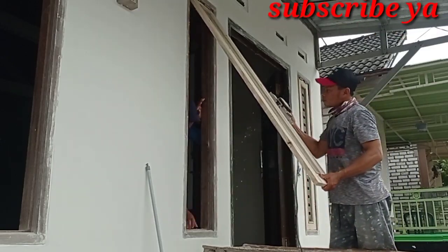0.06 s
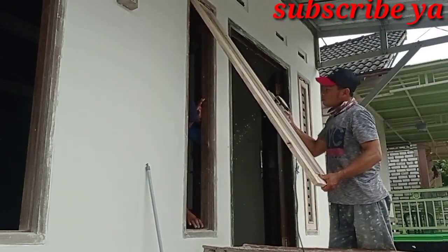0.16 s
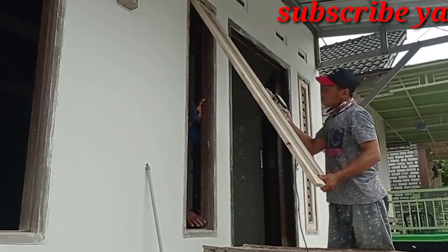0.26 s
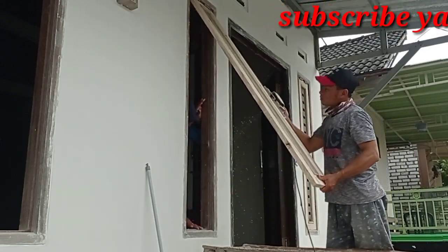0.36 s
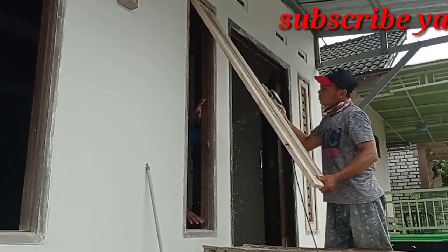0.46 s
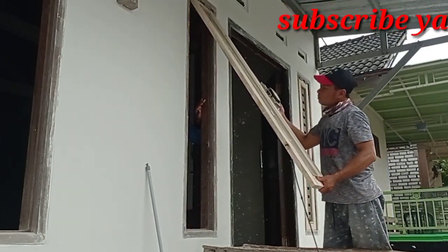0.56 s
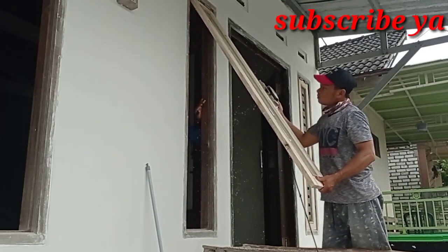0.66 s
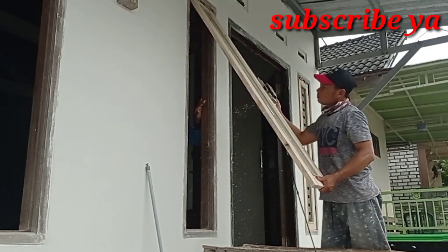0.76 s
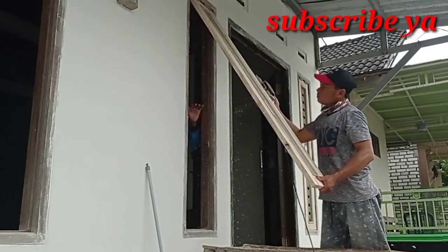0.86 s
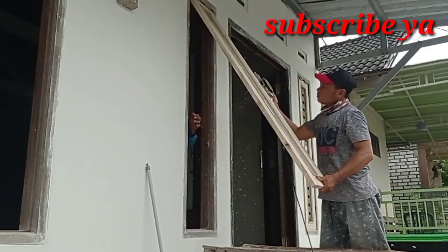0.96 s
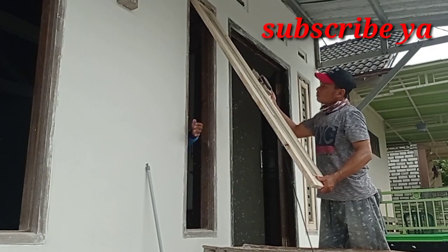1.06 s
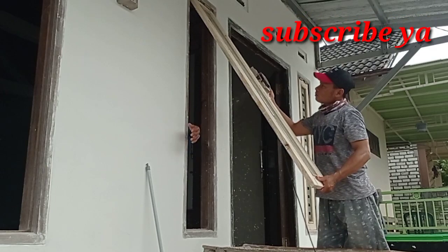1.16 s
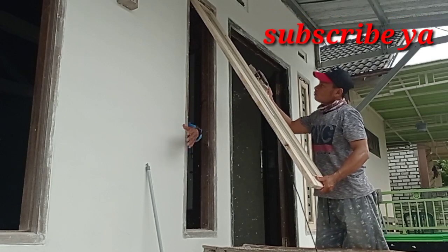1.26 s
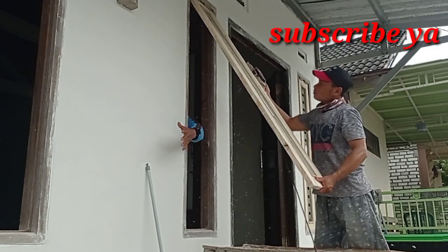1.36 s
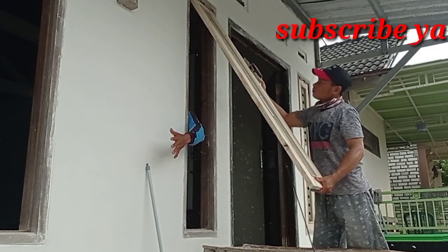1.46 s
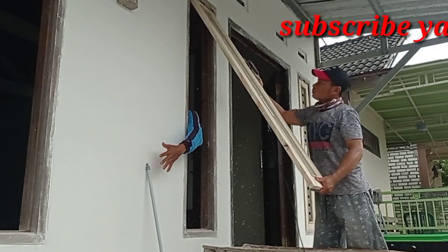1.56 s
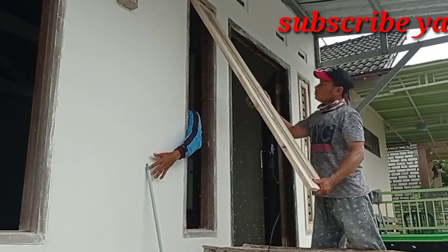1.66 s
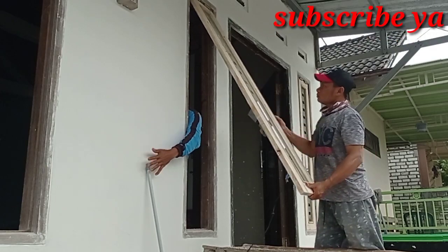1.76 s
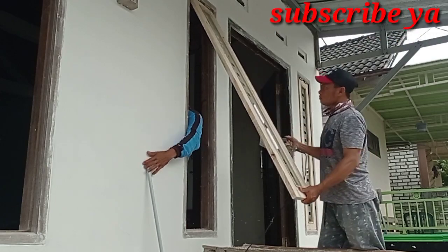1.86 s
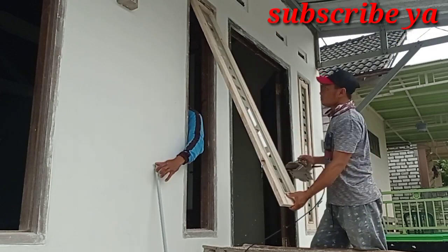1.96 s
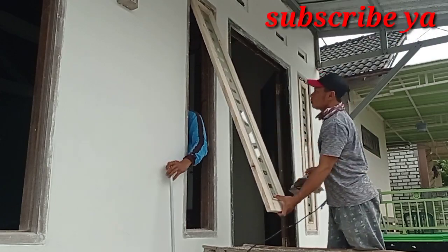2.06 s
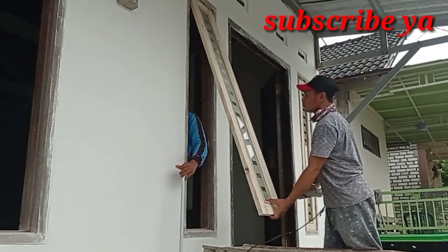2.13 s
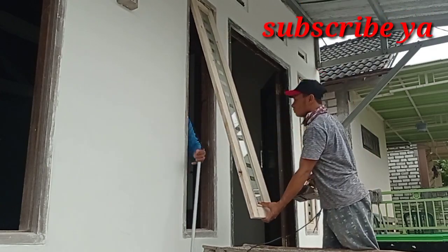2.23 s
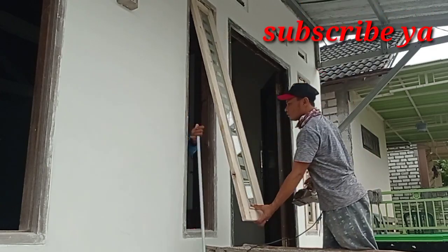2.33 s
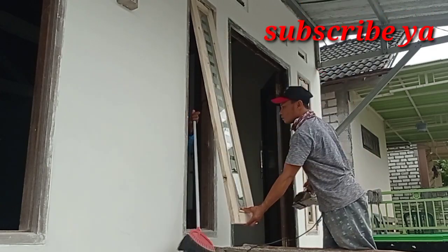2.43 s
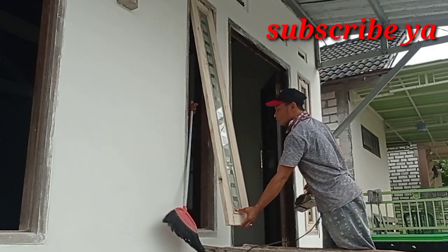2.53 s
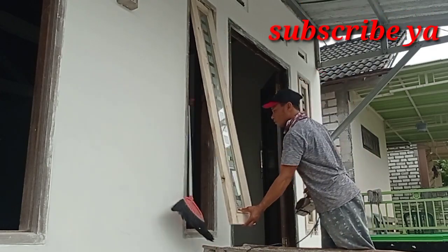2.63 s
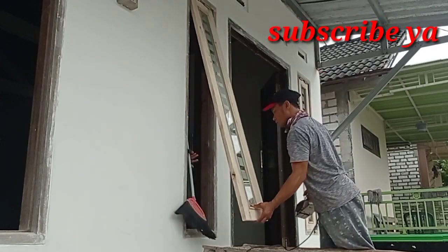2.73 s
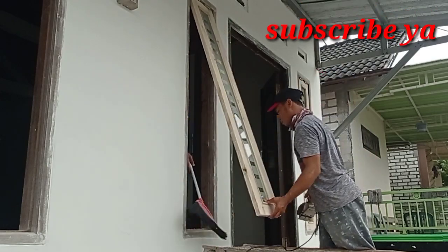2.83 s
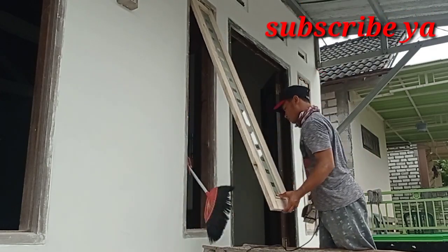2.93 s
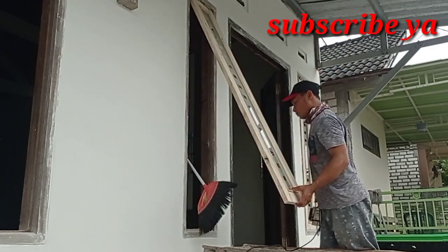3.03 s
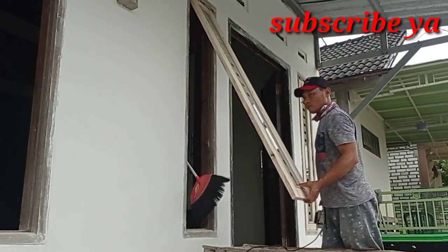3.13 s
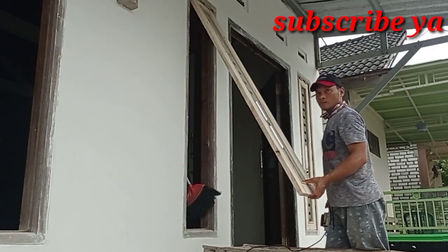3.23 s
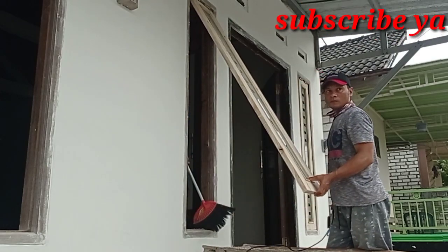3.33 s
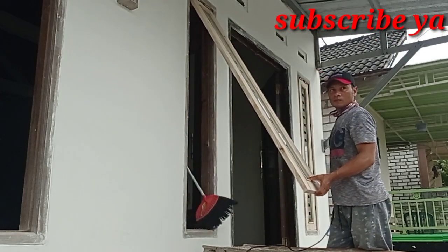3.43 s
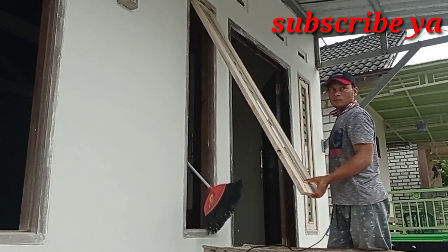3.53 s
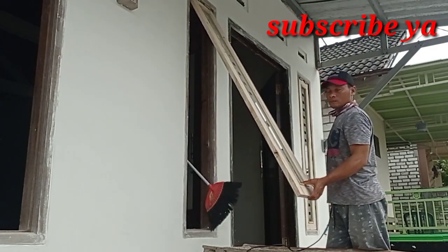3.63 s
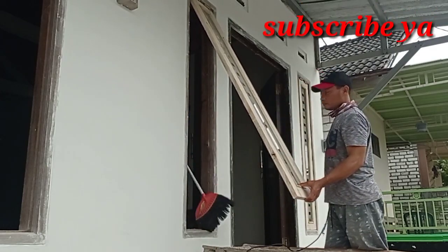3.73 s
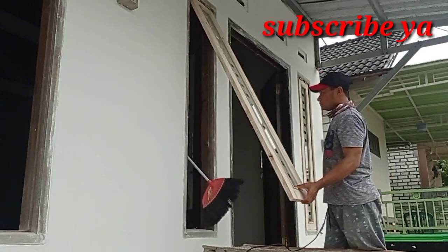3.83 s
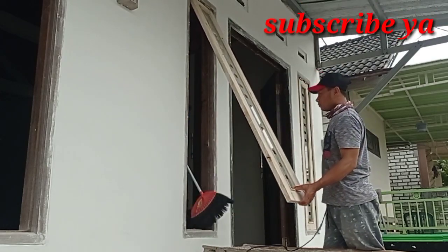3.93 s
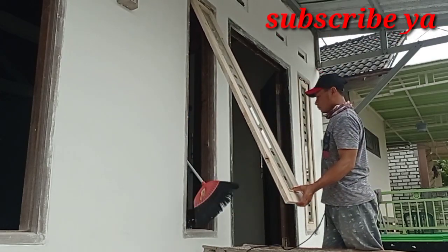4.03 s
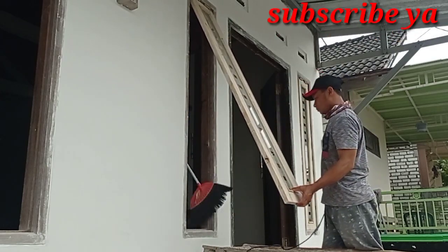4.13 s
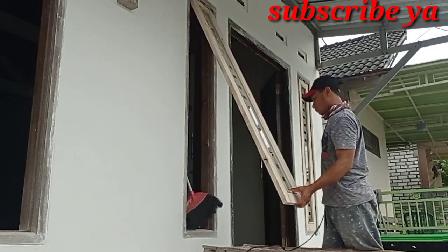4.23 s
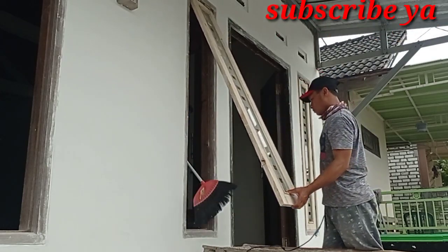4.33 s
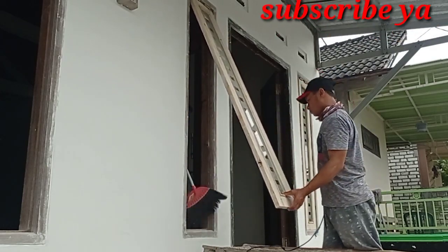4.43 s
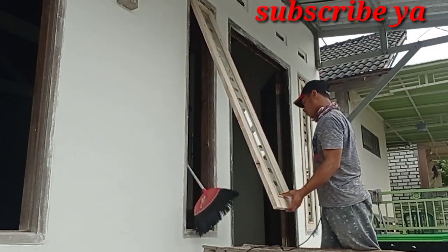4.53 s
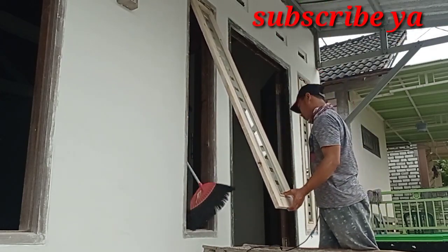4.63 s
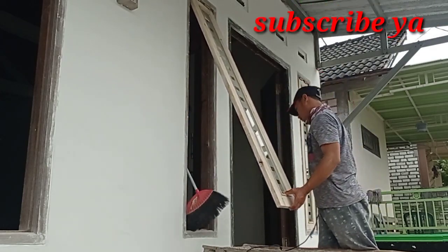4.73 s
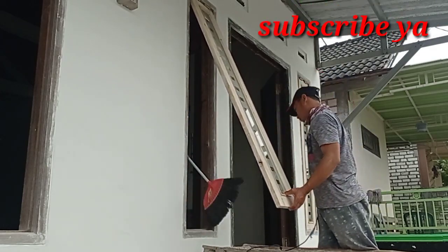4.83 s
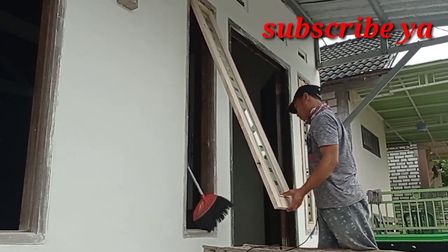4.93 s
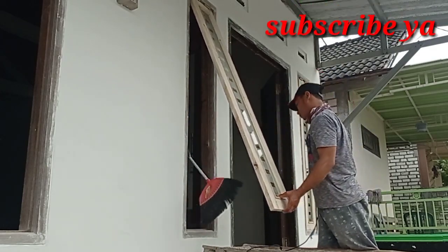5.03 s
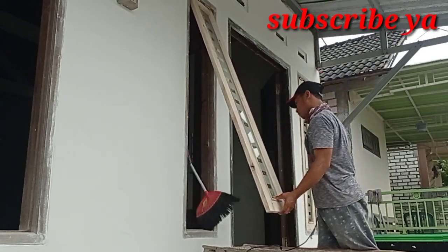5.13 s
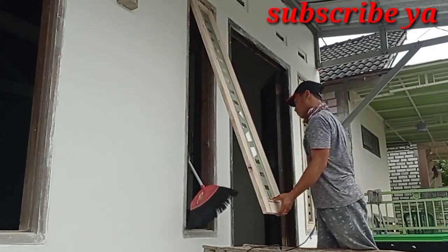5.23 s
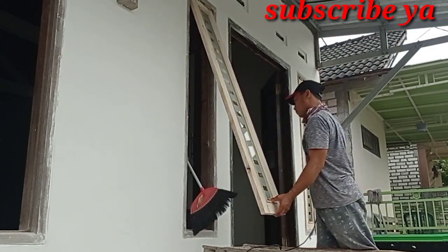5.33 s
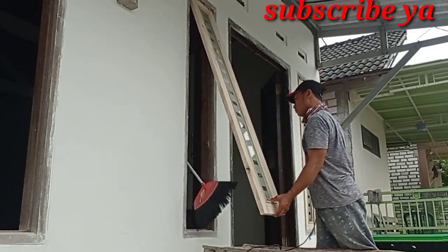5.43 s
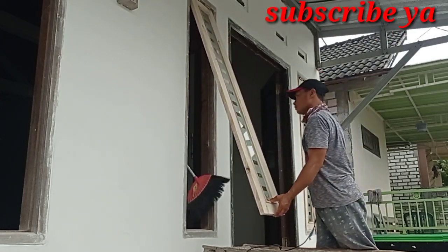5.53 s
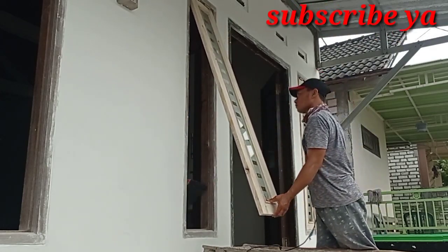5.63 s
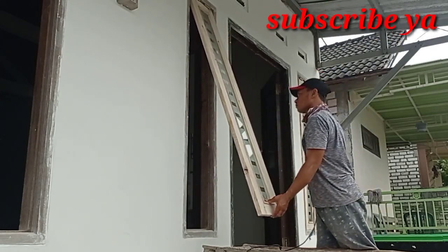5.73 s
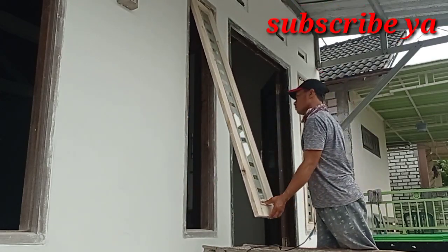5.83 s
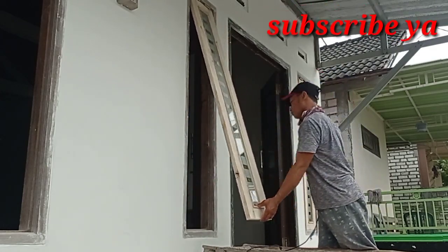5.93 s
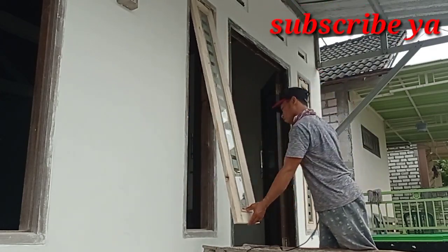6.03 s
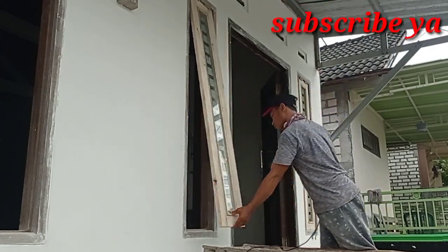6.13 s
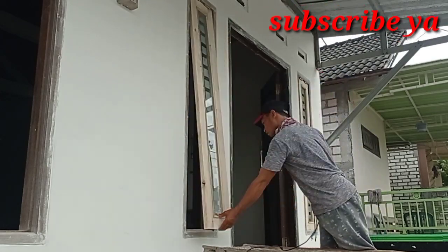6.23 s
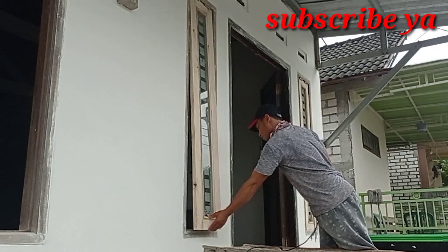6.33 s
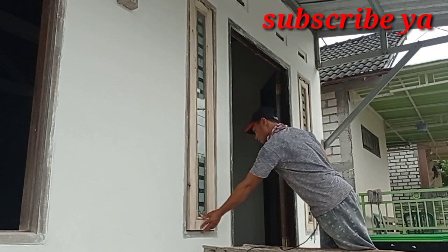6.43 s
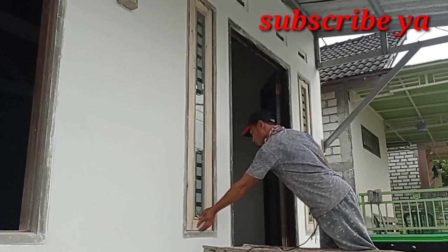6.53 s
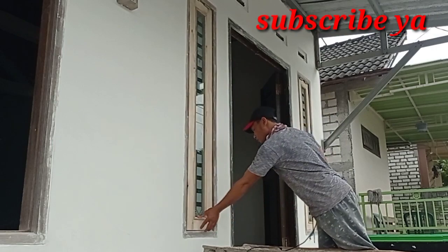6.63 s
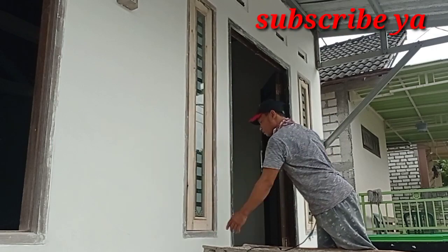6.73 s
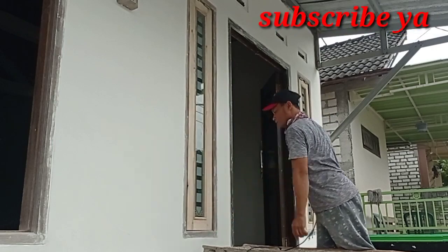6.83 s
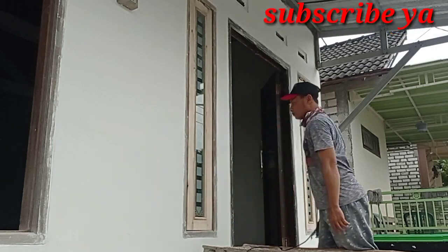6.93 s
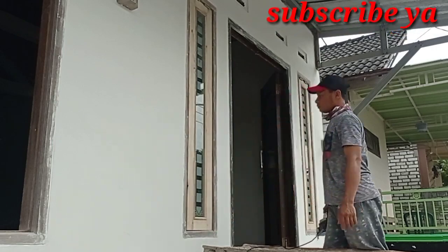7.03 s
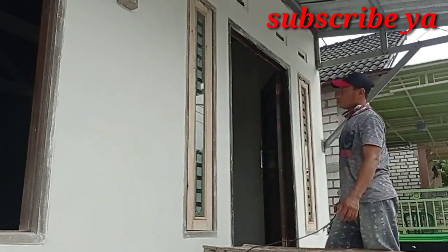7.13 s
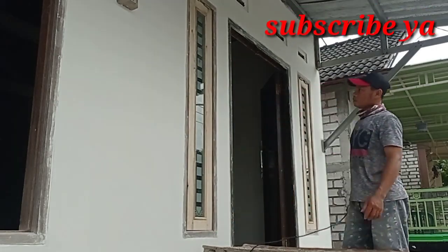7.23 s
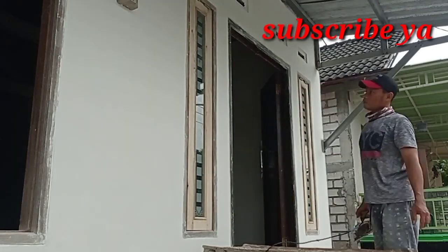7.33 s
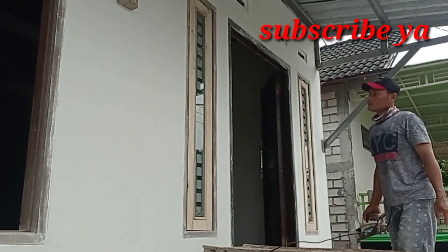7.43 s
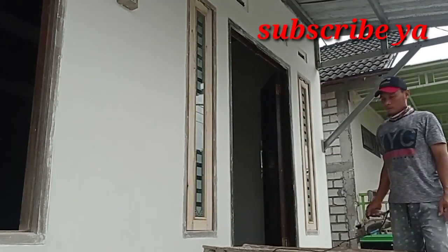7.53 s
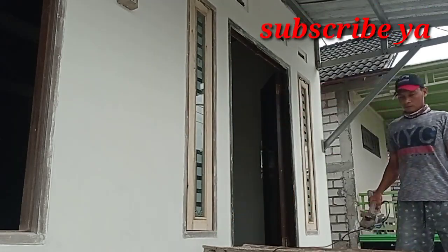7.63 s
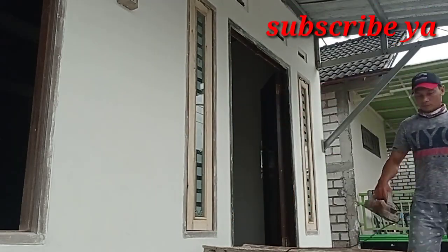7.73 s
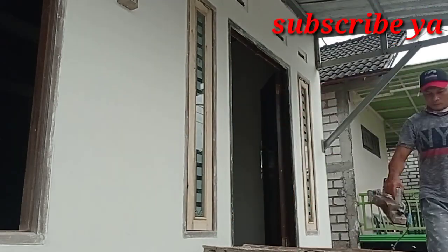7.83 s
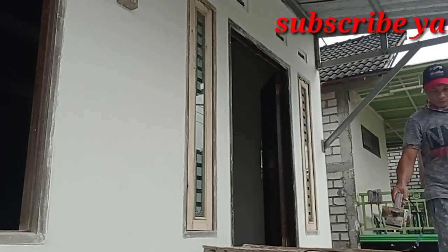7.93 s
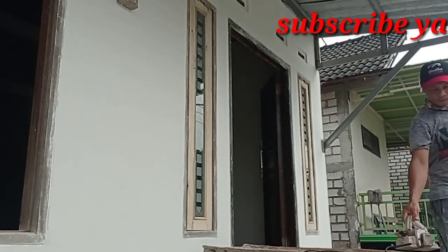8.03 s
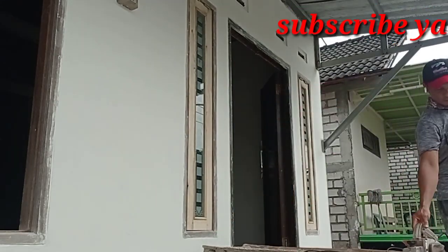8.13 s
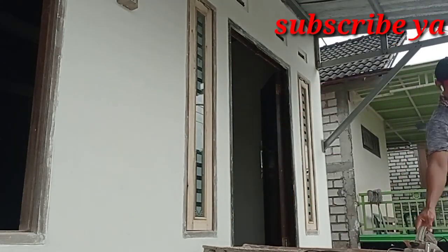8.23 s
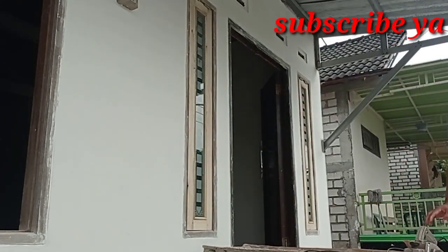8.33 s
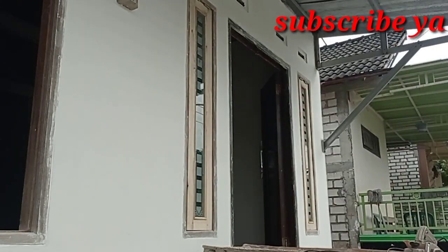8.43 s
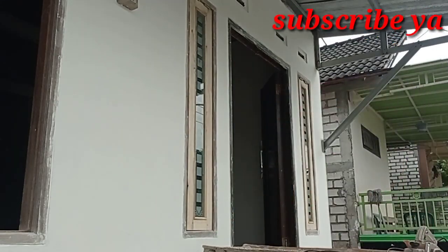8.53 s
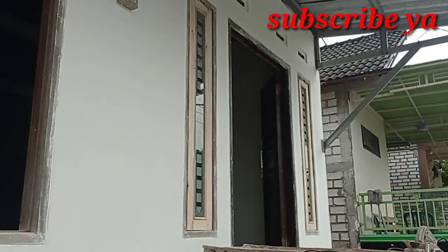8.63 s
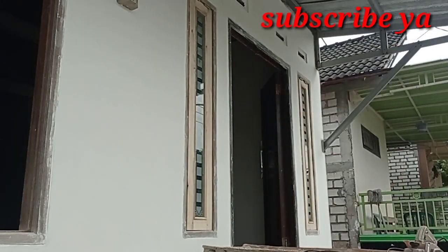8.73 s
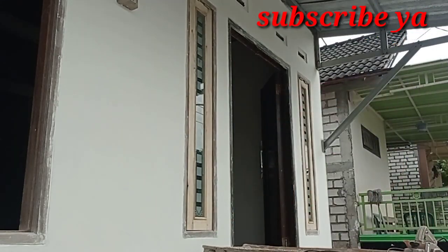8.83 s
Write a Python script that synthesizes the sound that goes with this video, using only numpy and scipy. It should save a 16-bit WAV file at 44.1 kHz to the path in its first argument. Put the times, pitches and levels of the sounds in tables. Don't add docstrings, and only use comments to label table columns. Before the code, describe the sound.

A close electric planer whines and coasts down in pitch as a motorbike putters past, then a wooden frame knocks shut and small clatters follow.

```python
import sys
import numpy as np
from scipy import signal
from scipy.fft import rfft, irfft
from scipy.io import wavfile
from scipy.ndimage import uniform_filter1d

SR = 44100
rng = np.random.default_rng(int(sys.argv[2]) if len(sys.argv) > 2 else 0)


def dump(signal):
    limited = np.clip(np.atleast_2d(signal).T, -1, 1)
    pcm = np.round(limited * 32767).astype(np.int16)
    wavfile.write(sys.argv[1], SR, pcm)


def ratio(d):
    e = np.asarray(d, float) / 20
    return 10 ** e


N = 391608

# freq_hz, density_db
YARD_SPECTRUM = [(15, -72.5), (25, -11), (144, 0.5), (209, -30.5), (331, -16), (457, -28.5), (614, -26.5),
                 (1050, -27), (1270, -35.5), (1570, -33.5), (3720, -54.5), (6210, -44), (6920, -47),
                 (15500, -66)]
# time_s, level_db
TRAFFIC = [(4.0, -45.5), (4.6, -49), (6.3, -52), (7.6, -57), (8.1, -49.5), (8.88, -59)]
# start_s, length_s, first_hz, last_hz, level_db
CHIRPS = [(4.715, 0.039, 4600, 4600, -67), (5.258, 0.058, 4630, 4600, -69), (4.602, 0.23, 2730, 2640, -81),
          (5.046, 0.026, 3250, 3200, -75), (5.159, 0.057, 4600, 4600, -79), (5.691, 0.071, 4250, 4170, -82),
          (6.76, 0.025, 3900, 4430, -68), (6.77, 0.039, 4330, 4380, -64.5), (6.993, 0.058, 1470, 1490, -74),
          (6.76, 0.11, 3080, 3160, -75), (6.85, 0.051, 3720, 3500, -69), (6.895, .04, 3400, 3150, -71),
          (6.914, 0.16, 2920, 2780, -72.5), (7.572, 0.09, 4280, 4200, -73), (7.738, 0.06, 4960, 4900, -65),
          (7.737, 0.1, 3130, 3000, -75), (8.155, 0.13, 2990, 2980, -72), (8.44, 0.04, 2700, 2880, -76),
          (8.472, 0.093, 2940, 2900, -72), (8.501, 0.029, 1280, 1220, -67), (8.532, 0.1, 4700, 4600, -80),
          (8.614, 0.16, 2800, 2730, -76.5), (7.8, .045, 7500, 7400, -76), (7.345, 0.028, 2550, 2700, -76),
          (6.81, .05, 4300, 4250, -78)]

# time_s, firing_rate_hz, level_db
BIKE = [(1.85, 43.6, -52), (2.2, 43.6, -36), (2.45, 43.8, -32.5), (2.75, 43.4, -33), (3.03, 43.3, -35.5),
        (3.5, 45.5, -44.5), (3.8, 48.5, -48), (4.04, 50.5, -56.5), (4.1, 42.4, -56), (4.45, 43.8, -51),
        (5.35, 50, -57)]
# time_s, lift_db
MISFIRES = [(2.36, -7), (2.58, -4), (2.69, -3), (2.925, -4.5), (3.065, -6), (3.225, -7), (3.27, -1),
            (3.33, -6), (3.4, -5), (4.13, -11)]
# time_s, level_db
ROAD = [(.75, -58), (1.45, -38), (1.67, -40), (2.4, -42.5), (2.83, -44.5), (3.19, -47.5), (4.2, -58.5),
        (5.4, -77), (6.4, -86)]
# freq_hz, density_db
BIKE_HISS = [(290, -27), (500, -1.5), (593, -6.5), (745, 0), (909, -2), (1030, -4.5), (1580, -6.5),
             (2390, -12.5), (3460, -12.5), (6390, -12), (13000, -36.5), (15000, -36.5)]
# freq_hz, width_hz, level_db
COWLING = [(1730, 300, -5.5), (2700, 120, -10.5), (4580, 150, -3.5), (3943, 200, -5), (6400, 440, -7)]

# freq_hz, t60_s
PORCH = [(200, 0.63), (530, 0.58), (1390, 0.24), (3680, 0.2), (9700, 0.24)]
# start_s, peak_db, colour_hz, thud_rel_db, snap_rel_db
TICKS = [(4.3603, -59, 1114, -19, -16), (4.7792, -29.5, 1150, -6.5, -19), (5.436, -45, 1370, -4.5, -12),
         (6.213, -52, 550, -6, -20), (6.291, -74, 1410, -6, 2), (6.4659, -41, 1090, 10, 3),
         (6.482, -42, 1000, -2, -18), (6.8283, -70, 1100, 0.5, 2), (7.07, -60, 923, 5.5, -3.5),
         (7.337, -43, 1130, -5, -20), (7.5693, -45, 1800, -16, 0), (7.7062, -38, 1450, -15, -6.5),
         (7.848, -42, 4040, -37, 9.5), (7.918, -54, 1750, -18, 0), (8.0025, -32, 4000, -45, -2.5),
         (8.0065, -27.5, 2630, -45, -10), (8.015, -39, 2500, -30, -4), (8.058, -50, 6000, -10, 1),
         (8.064, -52, 2400, -20, -14), (8.1065, -37, 3500, -20, 0.5), (8.1107, -34, 2500, -25, -10),
         (8.1925, -39, 1150, -6, -5), (8.2498, -48, 520, -6, -25), (8.272, -37, 1800, -20, -3),
         (8.2990, -43, 2450, -10, -7), (8.4757, -58, 2940, -40.5, -9), (8.766, -52.5, 1530, 3, 0),
         (8.772, -53, 2700, -5, -10), (8.874, -55, 900, 0, -8), (8.583, -62, 4400, -20, 0),
         (8.652, -58, 2130, -10, -15), (7.39, -60, 620, 0, -12)]
# start_s,
# length_s, level_db, centre_hz, width_hz
GRIT_BURSTS = [(4.947, 0.12, -73, 6100, 1500), (6.009, 0.028, -74, 6000, 800), (6.318, 0.074, -72, 6170, 600),
               (6.466, .006, -60, 7000, 8000), (6.478, .007, -56, 12000, 9000), (6.548, .04, -52, 13000, 5000),
               (7.53, .045, -75, 2500, 3000), (7.36, .1, -79, 2180, 200), (8.41, 0.047, -79, 1900, 900),
               (6.393, 0.22, -67, 3300, 6000), (6.456, 0.055, -55, 1490, 3500), (6.45, 0.069, -41.5, 295, 500),
               (7.138, 0.052, -77, 3020, 4970), (7.19, 0.36, -75, 1600, 2600), (7.558, 0.06, -67, 3500, 3980),
               (7.785, 0.065, -69, 6200, 1500), (7.915, 0.032, -62, 2600, 2000), (8.268, 0.045, -60, 1600, 2500),
               (8.477, 0.048, -69, 6700, 4600), (8.58, 0.09, -75.5, 5600, 4000), (8.822, 0.022, -70, 5900, 900),
               (6.321, 0.099, -78.5, 1490, 1500), (8.752, 0.09, -69.5, 2970, 6100),
               (7.538, 0.021, -71, 1500, 150), (6.288, .008, -70, 7900, 4000), (5.43, 0.028, -71, 7300, 2200),
               (8.19, .03, -64, 2600, 900), (8.33, 0.093, -77, 1160, 120), (4.775, 0.033, -68, 7400, 2500)]
# start_s, pitch_hz, level_db, t60_s
RINGS = [(7.702, 470, -49, .06), (7.708, 1450, -45, 0.032), (8.21, 300, -52, .04), (8.231, 1320, -61, .1),
         (8.25, 520, -48, 0.098), (8.256, 1850, -60, .05), (8.274, 1800, -50, .025),
         (8.277, 960, -45, 0.058), (8.289, 380, -49.5, 0.092), (8.299, 700, -50, 0.045),
         (8.302, 1000, -53, .02), (8.303, 298, -47, 0.069), (8.769, 735, -54, .06)]
# start_s, blow_db, crack_rel_db
KNOCKS = [
    (6.5285, -23, -15.5),
    (6.5455, -14.5, -8),
    (6.560, -28, -4),
    (6.584, -34, -1),
]
# freq_hz, level_db, t60_s
FRAME_MODES = [(95, -10, 0.14), (200, -1, .16), (353, -13, .07), (458, -8.5, 0.13), (663, -4, .045),
               (872, -6, .09), (1055, -12, .12), (1220, -10, .04), (1850, -8, .05), (2210, -9, .06)]
# freq_hz, density_db
RATTLE = [(59, -44), (100, -3.5), (205, -13), (626, -14), (695, -15), (1060, -12), (1340, -16.5),
          (1910, -17.5), (2410, -20.5), (4540, -20), (15400, -34.5)]

# time_s, drum_speed_hz, whine_db
PLANER = [(0.0, 258.7, -26.5), (0.2, 254.7, -28.5), (.56, 243.4, -28.5), (0.86, 234.5, -28.5),
          (0.94, 232.3, -31.5), (1.15, 237.2, -30), (1.55, 234, -29.5), (1.65, 221.4, -28),
          (1.8, 203.2, -26), (2.1, 173.6, -30.5), (2.38, 148, -34.5), (2.66, 123.7, -35),
          (2.85, 107.3, -49)]
# multiple, powered_db, coasting_db
DRUM = [(1, -26.5, -22.5), (2, -10.5, -18.5), (3, -24, -28), (4, -15.5, -10), (5, -9.5, -14.5),
        (6, -11.5, -9.5), (7, -16.5, -20.5), (8, -10.5, -17.5), (9, -14.5, -17), (10, -8.5, -18.5),
        (11, -16.5, -16), (12, -12.5, -18.5)]
# freq_hz, level_db
HIGH_ORDERS = [(2500, -3), (4000, -3), (6700, -3.5), (7500, -9), (9000, -19), (11000, -28)]
# freq_hz, density_db
FAN = [(88, -56.5), (150, -29.5), (339, -15), (445, -7), (481, -4), (550, -7), (948, 1.5), (1540, -4.5),
       (2410, -5), (2700, -8), (6470, -5), (12800, -32), (15500, -29.5)]
# freq_hz, width_hz, lift_db
HOUSING = [(910, 140, 5.5), (1266, 350, 3.5)]
# time_s, half_length_s, multiple, lift_db
ORDER_SWELLS = [(.04, .07, 12, 11), (.15, .22, 4, 15.5), (0.18, .2, 3, 19.5), (0.17, 0.22, 1, 8),
                (.15, 0.04, 26, 5.5), (0.23, 0.36, 8, 7), (.3, 0.097, 6, 10), (.55, .07, 16, 8.5),
                (.63, 0.11, 5, 4), (.65, .1, 30, 7.5), (.67, 0.103, 4, 6), (.97, 0.08, 4, 7.5), (0.27, 0.22, 2, 4),
                (1.03, 0.3, 8, 12), (.98, 0.22, 16, 5), (.75, 0.18, 24, 5.5), (1.37, 0.41, 2, 11),
                (1.3, 0.15, 7, 13.5), (1.36, 0.1, 5, -1.5), (1.42, 0.17, 9, 11.5), (1.42, 0.2, 10, 7.5),
                (1.63, 0.05, 3, 10), (1.76, 0.098, 6, 9.5), (1.85, 0.29, 10, 9.5), (2.39, 0.047, 6, 11.5),
                (2.62, 0.052, 7, 23.5), (2.47, 0.1, 10, 8), (2.203, 0.074, 8, 7), (0.46, 0.15, 12, 8),
                (1.62, 0.065, 2, 10), (1.77, .05, 2, -7), (2.03, .06, 2, 8.5), (1.575, .04, 4, 5),
                (1.65, .04, 4, -6), (1.37, .07, 4, -9), (1.744, 0.045, 4, 5), (1.98, .15, 5, -11),
                (1.04, .07, 5, -9), (1.0, .1, 6, 7), (1.5, .12, 6, 5.5), (1.26, .08, 11, 10.5), (0.87, .09, 11, 7),
                (.18, .08, 11, -10), (.94, .07, 10, 11), (.95, .2, 3, 6), (2.356, .06, 14, 9.5),
                (2.65, .06, 8, 13), (2.15, .2, 21, 6), (1.67, .08, 7, 6), (2.25, .06, 6, -4.5),
                (0.13, 0.05, 15.0, -14.0), (0.13, 0.05, 22.0, -14.0), (0.21, 0.05, 23.0, -14.0),
           (0.27, 0.08, 19.0, -10.5), (0.29, 0.05, 3.0, 13.5), (0.3, 0.13, 31.0, -12.2),
           (0.31, 0.13, 27.0, -12.9), (0.37, 0.05, 16.0, -13.3), (0.38, 0.13, 4.0, 6),
           (0.39, 0.13, 26.0, -14.0), (0.67, 0.08, 9.0, -11.3), (0.69, 0.05, 13.0, -14.0),
           (0.74, 0.05, 20.0, -10.5), (0.89, 0.13, 25.0, 12.5), (0.91, 0.13, 28.0, -11),
           (0.92, 0.13, 23.0, 9), (1.05, 0.13, 24.0, 9.5), (1.11, 0.05, 19.0, -13.2),
           (1.12, 0.2, 32.0, -13), (1.14, 0.13, 10.0, -11.5), (1.17, 0.2, 21.0, -9.1),
           (1.21, 0.08, 16.0, -12.4), (1.22, 0.13, 8.0, 6.5), (1.22, 0.13, 29.0, -14.0),
           (1.34, 0.05, 27.0, -13.5), (1.67, 0.2, 28.0, -10.5), (1.86, 0.05, 22.0, -14.0),
           (1.98, 0.054, 7.0, -16), (2.23, 0.08, 11.0, -14.0), (2.43, 0.13, 7.0, 12.5),
                (0.22, 0.12, 5, 6.2), (0.36, 0.07, 18, -9.7), (0.37, 0.12, 15, -7.3), (0.43, 0.04, 25, -10.2),
         (0.45, 0.04, 14, -9.0), (0.47, 0.2, 3, -6.8), (0.65, 0.07, 29, -11.8), (0.65, 0.12, 17, -7.3),
         (0.68, 0.07, 26, -8.4), (0.79, 0.07, 8, 6.5), (0.82, 0.2, 23, -4.7), (0.85, 0.2, 18, -6.3),
         (1.03, 0.04, 24, -9.9), (1.03, 0.2, 13, -7.7), (1.09, 0.12, 17, -10.3), (1.2, 0.07, 20, -9.0),
         (1.27, 0.12, 23, 8.2), (1.37, 0.12, 3, -7.4), (1.41, 0.07, 24, -10.9)]
# time_s, half_length_s, centre_hz, half_width_hz, lift_db
BAND_SWELLS = [
    (1.006, .13, 4330, 1900, -5.5),
    (1.253, .05, 5700, 1500, 2.5),
    (2.62, .12, 2100, 390, 7.5),
    (.05, .06, 4500, 2000, -4.5),
]


def evened(x):
    return x / np.sqrt(np.mean(x ** 2) + 1e-20)


def read(points, hz):
    f, value = np.transpose(points)
    return np.interp(np.log(hz + 1), np.log(f + 1), value)


def curves(rows):
    s, *columns = np.transpose(rows)
    t = np.arange(N) / SR
    since_start = (t - s[0]) * (s[0] > 0) + (s[0] <= 0)
    gate = np.clip(np.minimum(since_start, s[-1] - t) / 0.1, 0, 1)
    return [np.interp(t, s, c) for c in columns] + [gate]


def add(mix, s, sound):
    part = mix[round(s * SR):][:len(sound)]
    part += sound[:len(part)]


def resonate(x, hz, width):
    turn = np.exp(2j * np.pi * np.cumsum(hz * np.ones(len(x))) / SR)
    r = np.exp(-np.pi * width / SR)
    return 2 * (turn * signal.lfilter([1 - r], [1, -r], x / turn + 1e-18)).real


def ring_twice(x, hz, width, next_hz, next_width):
    return evened(resonate(resonate(x, hz, width), next_hz, next_width))


def hiss(spectrum, patchy_db, flicker_db=0):
    frames, hz = N // 256 + 5, np.fft.rfftfreq(1024, 1 / SR)
    a, b, patches = rng.standard_normal((frames, 513, 3)).T
    patches = uniform_filter1d(patches, size=12, axis=0)
    patches = evened(uniform_filter1d(patches, size=14, axis=1))
    flicker = evened(uniform_filter1d(a[0], size=5))
    level_db = read(spectrum, hz)[:, None] + patchy_db * patches + flicker_db * flicker
    z = (a + 1j * b) * ratio(level_db)
    return evened(signal.istft(z, nperseg=1024, noverlap=768)[1][:N])


def yard():
    t = np.arange(N) / SR
    drone_db, _ = curves(TRAFFIC)
    hum = ring_twice(rng.standard_normal(N), 126.4, 34, 150, 140)
    swell = np.clip(t - 3, .3, 1)
    cricket_hz = 10500
    cricket = ratio(-104) * ring_twice(rng.standard_normal(N), cricket_hz, 60, cricket_hz, 120)
    cricket = cricket * ratio(4 * evened(uniform_filter1d(rng.standard_normal(N), size=4000)) - 3)
    lull_db = -4 * np.exp(-((t - 8.47) / .14) ** 4)
    floor = ratio(-59 + lull_db) * hiss(YARD_SPECTRUM, patchy_db=2.0)
    return floor + swell * ratio(drone_db - 8.5) * hum + cricket


def chirp(length, first_hz, last_hz, db):
    n = round(length * SR)
    glide_hz = np.linspace(first_hz, last_hz, n)
    frayed = evened(resonate(rng.standard_normal(SR // 4)[:n], glide_hz, 70))
    return ratio(db - 3 - np.linspace(0, 3, n)) * frayed * signal.windows.tukey(n, .3)


def bike_firings(rate, far):
    turns = np.cumsum(rate) / SR
    one_firing = round(2.627 * SR)
    at = np.flatnonzero(np.diff(np.floor(turns - turns[one_firing])))
    luck = rng.standard_normal((700, 3))[:len(at)]
    late = .0036 * SR * np.clip(1 - 3 * far[at], .3, 1) * luck[:, 0]
    fire = np.zeros(N)
    fire[np.clip(at + late.astype(int), 0, N - 1)] = -ratio(2 * luck[:, 1])
    crack_db = 3 * np.interp(np.arange(N), at, np.clip(luck[:, 2], -2.5, 1))
    return fire, -fire * ratio(crack_db)


def motorbike():
    rate, level_db, gate = curves(BIKE)
    t = np.arange(N) / SR
    misfire_s = 0.03
    level_db = level_db + sum(db * np.exp(-((t - s) / misfire_s) ** 2) for s, db in MISFIRES)
    leaves_s, gone_s = 2.77, 5.93
    far = np.clip((t - leaves_s) / (gone_s - leaves_s), 0, 1)
    fire, bang = bike_firings(rate, far)

    pipe_s = .004
    boom = ring_twice(np.roll(fire, round(pipe_s * SR)), 122.0, 70, 105, 170)
    pop = ring_twice(resonate(bang, 300, 165), 340, 224, 320, 280)
    pop = pop + ratio(-14) * ring_twice(bang, 510, 250, 510, 300)

    hiss_db, hiss_gate = curves(ROAD)
    growl_db = np.clip(hiss_db + 2, -61.5, -44)
    tyres = hiss(BIKE_HISS, patchy_db=1.6, flicker_db=.9)
    tyres = tyres + sum(ratio(db) * resonate(tyres, hz, width) for hz, width, db in COWLING)
    dull = signal.lfilter(*signal.butter(2, 11000, fs=SR), tyres)
    tyres = dull + ratio(-9 * far) * (tyres - dull)
    growl = ring_twice(rng.standard_normal(N), 250, 220, 260, 290)

    hum_rise = np.clip((t - leaves_s) / 0.56, 0.14, 1)
    hum = hum_rise * ratio(3) * ring_twice(fire, 3 * rate, 9, 3 * rate, 25) / np.sqrt(2)
    pipe = ratio(-2.5 * far - 2.0) * boom + ratio(-8.5 - 15.5 * far) * pop + hum
    road = ratio(hiss_db - 1.72) * tyres + ratio(growl_db - 3) * growl
    return gate * ratio(level_db) * -pipe + hiss_gate * road


def porch():
    taps = np.zeros(SR)
    at = np.arange(200, SR - 20, 20)
    taps[at + rng.integers(0, 20, len(at))] = rng.choice([-1., 1.], len(at))
    hz, t, z = signal.stft(taps, SR, nperseg=256)
    decay = ratio(-60 * t / read(PORCH, hz)[:, None])
    tail = signal.istft(z * decay, SR, nperseg=256)[1]
    return tail / np.linalg.norm(tail)


def tick(db, hz, thud_db, snap_db):
    t = np.arange(SR // 6) / SR
    t60 = .1 * ratio(-0.14 * (db + 37)) * (1000 / hz) ** 0.16
    grit = rng.standard_normal(len(t))
    bounce = 1 + 0.3 * (t > .007 + .004 * rng.random())
    snap = ring_twice(grit, 5500, 5400, 3000, 7700) * ratio(snap_db + 3.5 - 60 * t / (0.6 * t60))
    body = ring_twice(grit, hz, 0.24 * hz, hz, 2.8 * hz) * ratio(1.5 - 60 * t / (0.31 * t60))
    thud = ring_twice(grit, 460, 480, 330, 840) * ratio(thud_db - 1.5 - 60 * t / t60)
    return ratio(db - 11.5) * (snap + body + thud) * bounce * np.minimum(t / 0.003, 1)


def scuff(length, db, hz, width):
    n = round(length * SR)
    grit = rng.standard_normal(SR // 2)[:n] * ratio(1.9 * rng.standard_normal(SR // 2)[:n])
    return ratio(db) * ring_twice(grit, hz, width, hz, 2 * width) * signal.windows.tukey(n, .5)


def ring(hz, db, t60):
    t = np.arange(SR // 8) / SR
    return ratio(db - 60 * t / t60) * np.sin(2 * np.pi * hz * t) * np.minimum(t / 0.0018, 1)


def knock(db, crack_db):
    t = np.arange(SR // 3) / SR
    modes = sum(ratio(d - 60 * t / min(t60, .25)) * np.sin(2 * np.pi * f * t) for f, d, t60 in FRAME_MODES)
    colour = ratio(read(RATTLE, np.fft.rfftfreq(len(t), 1 / SR)))
    grains = ratio(1.2 * evened(uniform_filter1d(rng.standard_normal(len(t)), size=90)))
    rattle = evened(irfft(rfft(rng.standard_normal(len(t))) * colour, len(t)) * grains)
    dull = signal.lfilter(*signal.butter(2, 6500, fs=SR), rattle)
    shake = rattle * ratio(crack_db - 60 * t / 0.085) + dull * ratio(crack_db - 17.0 - 60 * t / 0.4)
    return ratio(db) * (ratio(-4.5) * modes / abs(modes).max() + shake) * np.minimum(t / 0.0035, 1)


def order_lift_db(k, t, order_hz):
    shell = sum(lift / (1 + (2 * (order_hz - f) / width) ** 2) for f, width, lift in HOUSING)
    order_swell = sum(lift * np.exp(-((t - s) / half) ** 4)
                 for s, half, order, lift in ORDER_SWELLS if round(order) == k)
    band_swell = sum(lift * np.exp(-((t - s) / half) ** 4 - ((order_hz - f) / width) ** 4)
                 for s, half, f, width, lift in BAND_SWELLS)
    return shell + order_swell + band_swell


def planer():
    n = 3 * SR
    drum_hz, cut_db, gate = (c[:n] for c in curves(PLANER))
    time, turns = np.arange(n) / SR, np.cumsum(drum_hz) / SR
    off_s, run_down_s = 1.433, 0.24
    coast = np.clip((time - off_s) / run_down_s, 0, 1)
    air_db = -34.5 + 0.69 * (cut_db + 28) + np.clip(-33.5 * (time - off_s), -28, 0)
    air_db = air_db + 4 * np.exp(-((time - 1.28) / 0.022) ** 2)

    steps = np.arange(302)
    chance = rng.standard_normal((2, 46, 302))
    drift = evened(uniform_filter1d(chance[0], size=11, axis=1))
    drift = drift + .6 * evened(uniform_filter1d(chance[1], size=3, axis=1))
    whine = np.zeros(n)
    t, hz, whine_db, hiss_db, coasting = (c[::100] for c in (time, drum_hz, cut_db, air_db, coast))
    for k in range(1, 46):
        waver, wobble = (np.interp(t * 100, steps, row) for row in drift[[k, k - 1]])
        flicker = np.interp(t * 100, steps, evened(uniform_filter1d(chance[1, k], size=4)))
        if k <= 12:
            _, powered_db, coasting_db = DRUM[k - 1]
            db = whine_db - 6 + powered_db + (coasting_db - powered_db) * coasting
            db = db + 1.5 * waver + 4 * coasting * flicker
        else:
            drive_db = np.maximum(hiss_db - 7, whine_db - 6 - .75 * k - 8 * (k % 2))
            db = drive_db + read(HIGH_ORDERS, k * hz) + 2.5 * waver - 1.5 * (k % 2) + 2.2
            db = db - 8 * coasting + 3 * coasting * flicker
        if k == 2:
            db = db - 30 * np.clip((175 - hz) / 30, 0, 1)
        db = db + order_lift_db(k, t, k * hz)
        slip = np.interp(time, t, .035 * (240 / hz) ** 3.2 * wobble)
        phase = k * turns + slip + rng.random()
        whine += np.interp(time, t, ratio(db)) * np.cos(2 * np.pi * phase)

    throb = 1 + .3 * np.cos(2 * np.pi * turns) + .2 * np.cos(4 * np.pi * turns)
    air = ratio(air_db) * throb * hiss(FAN, patchy_db=.7)[:n]
    small = signal.lfilter(*signal.butter(3, 210, "high", fs=SR), whine + air)
    return np.pad(gate * small, (0, N - n))


def scene():
    tool, room, bike, floor = planer(), porch(), motorbike(), yard()
    frame, hits, birds = np.zeros((3, N))
    layers = ((frame, KNOCKS, knock), (hits, TICKS, tick), (hits, GRIT_BURSTS, scuff),
              (hits, RINGS, ring), (birds, CHIRPS, chirp))
    for mix, table, source in layers:
        for s, *row in table:
            add(mix, s, source(*row))
    frame = signal.lfilter(*signal.butter(5, 8000, fs=SR), frame) + ratio(-30) * frame
    hits = signal.lfilter(*signal.butter(3, 7600, fs=SR), hits) + ratio(-21) * hits
    thin = signal.lfilter(*signal.butter(2, 1300, "high", fs=SR), hits)
    sent = ratio(-7.5) * tool + ratio(-11) * frame + ratio(-10.5) * thin
    sent = sent + ratio(-12.0) * birds + ratio(-15.5) * bike
    wet = signal.fftconvolve(sent, room)[:N]
    return (tool + bike + floor + frame + hits + birds + wet)[None]


def low_pass(x):
    return signal.sosfilt(signal.butter(12, 16850, fs=SR, output="sos"), x)


def record(dry):
    x = signal.lfilter(*signal.butter(2, 60, "high", fs=SR), dry)
    shelf = signal.lfilter(*signal.butter(3, 7500, fs=SR), x)
    x = shelf + ratio(-2.5) * (x - shelf)
    x = x + ratio(2.0) * resonate(resonate(x[0], 15000, 720), 15000, 890)
    band_edge = signal.firwin(511, 15500, window=("kaiser", 9), fs=SR)
    x = signal.oaconvolve(x, band_edge[None], "same")
    return low_pass(x)


dry = scene()
out = record(dry)
dump(out)
```